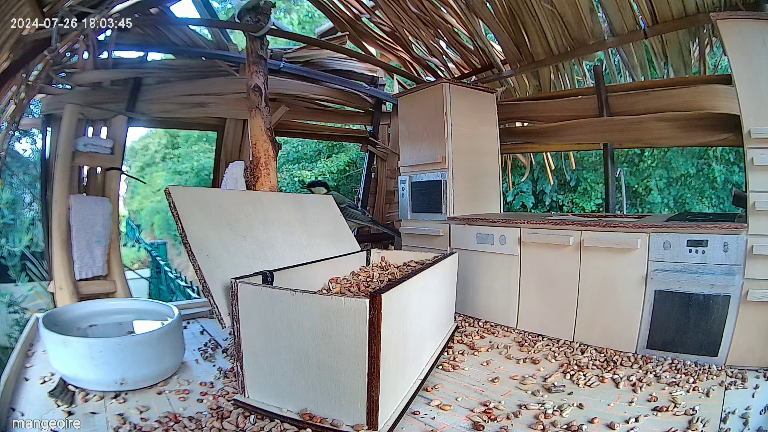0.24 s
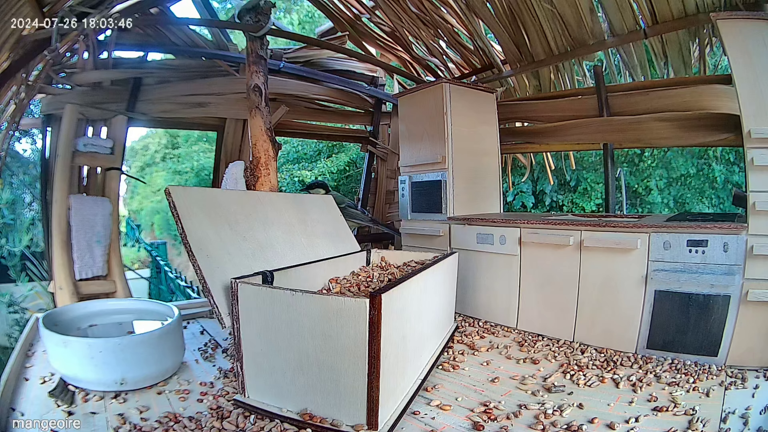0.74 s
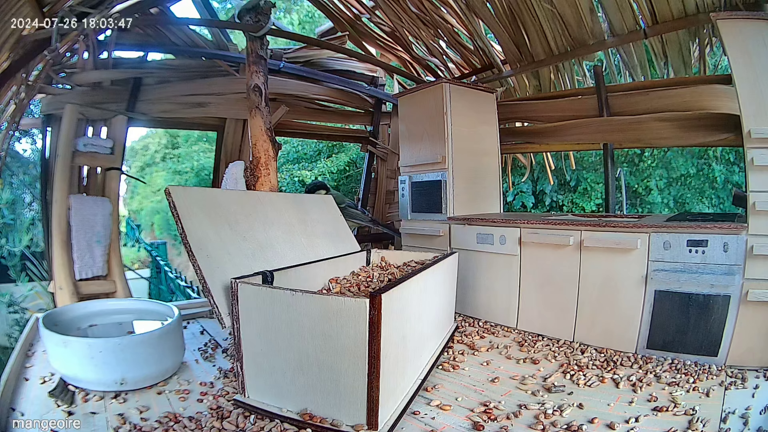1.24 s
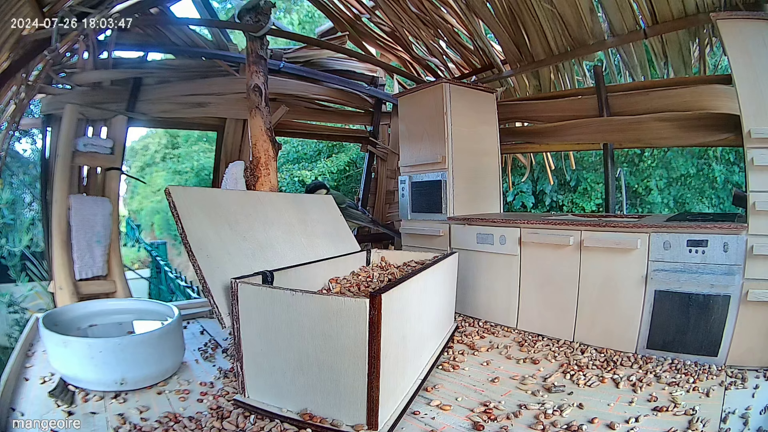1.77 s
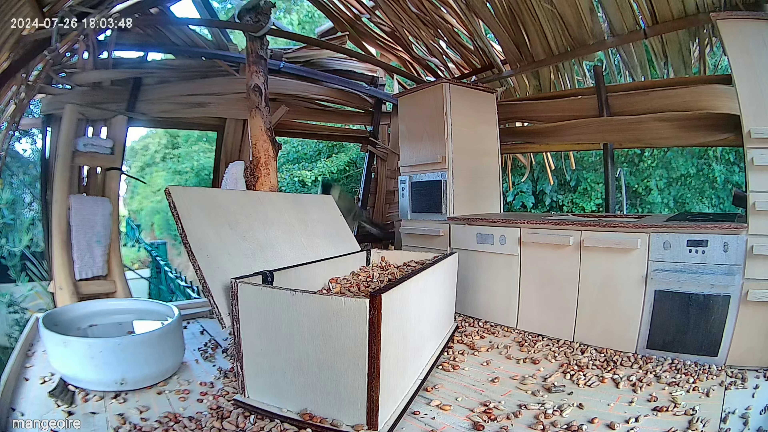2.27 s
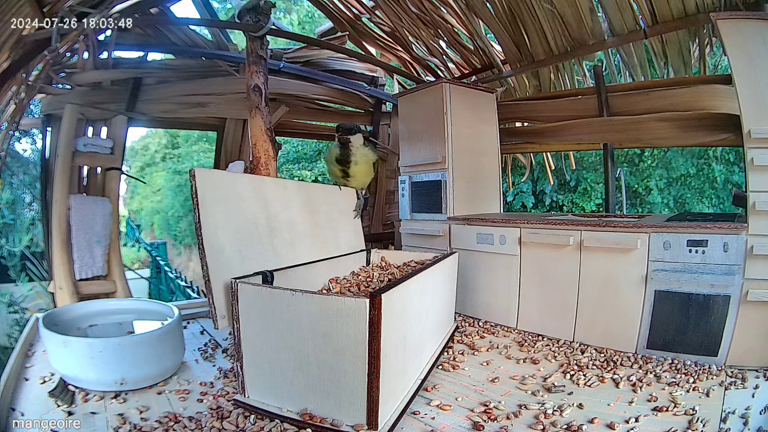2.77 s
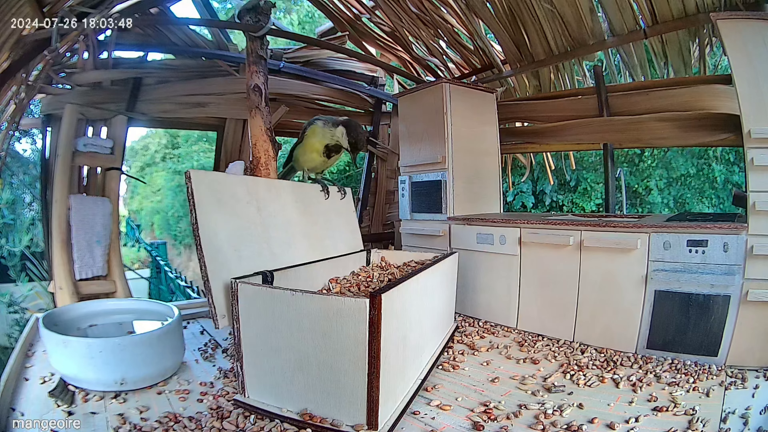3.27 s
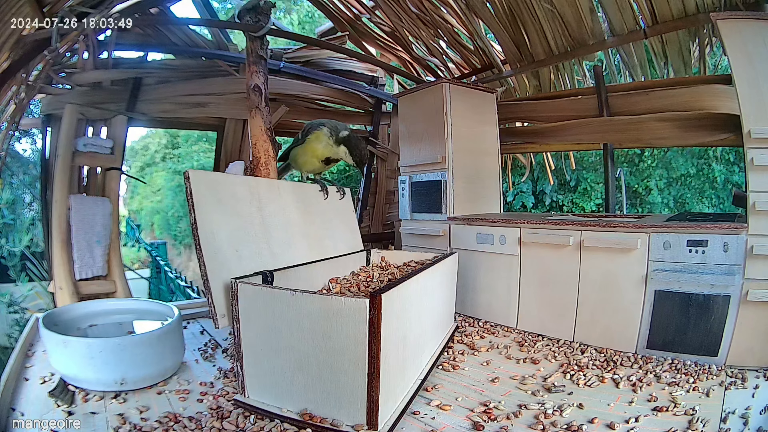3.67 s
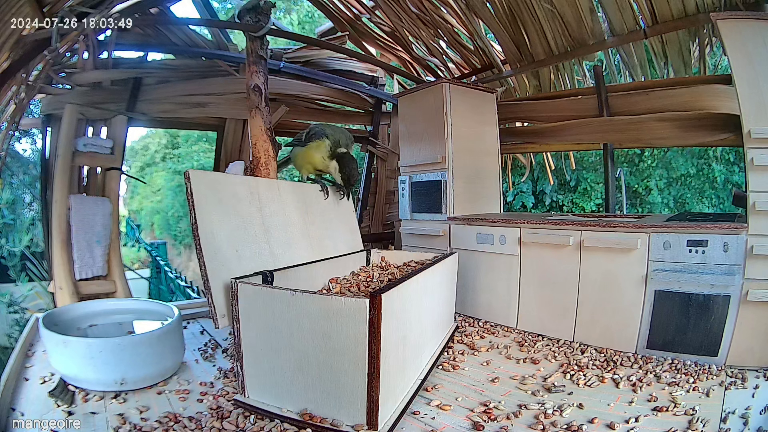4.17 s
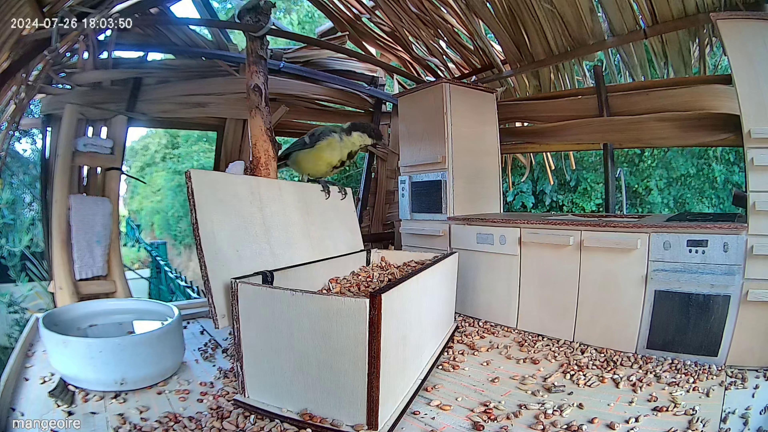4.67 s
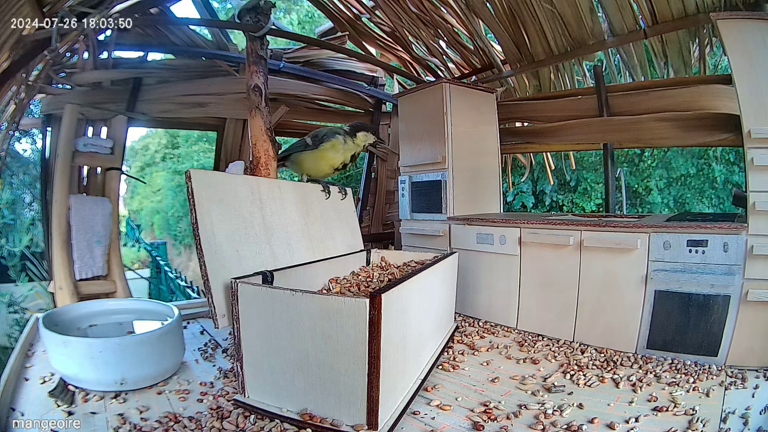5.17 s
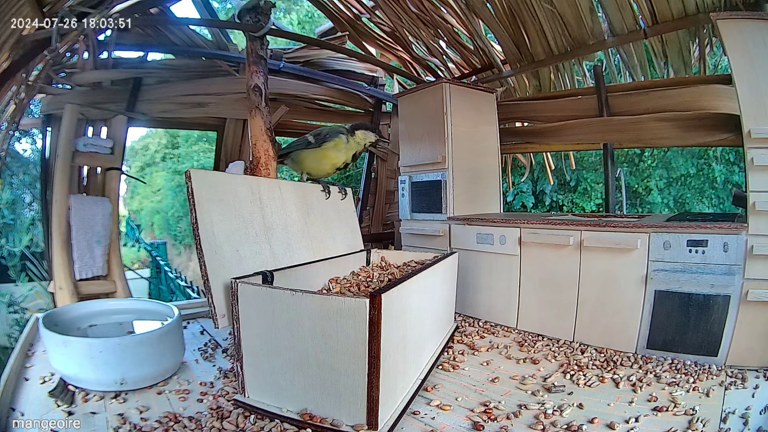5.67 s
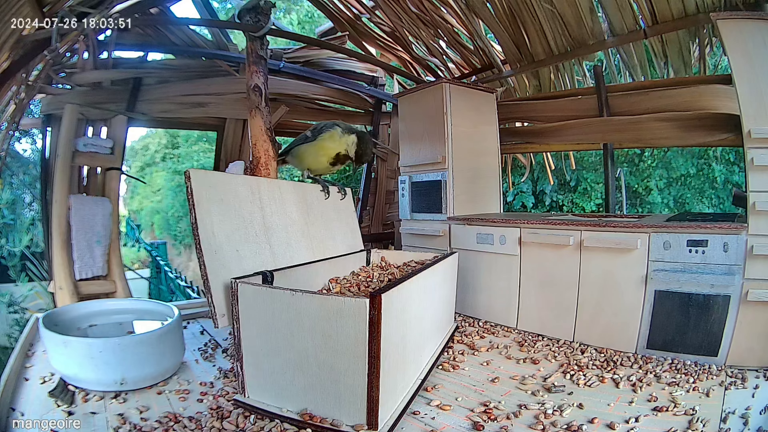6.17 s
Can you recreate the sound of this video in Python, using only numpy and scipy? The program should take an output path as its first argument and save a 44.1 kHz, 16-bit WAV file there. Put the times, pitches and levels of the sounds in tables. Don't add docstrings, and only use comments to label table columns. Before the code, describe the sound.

Sharp tit calls and trills ring among trees with faint ticks and one click, fading before a brisk alternating high-low birdsong.

```python
import sys
import numpy as np
from scipy import signal
from scipy.fft import rfft, irfft, next_fast_len
from scipy.io import wavfile
from scipy.ndimage import uniform_filter1d, map_coordinates

SR = 44100
rng = np.random.default_rng(int(sys.argv[2]) if len(sys.argv) > 2 else 0)


def put_to_file(sound):
    columns = np.atleast_2d(sound).T
    safe = np.clip(columns, -1, 1)
    whole_steps = np.round(safe * 32767)
    wavfile.write(sys.argv[1], SR, whole_steps.astype(np.int16))


def magnitude_from_level(level_db):
    exponent = np.asarray(level_db, float) / 20
    return 10 ** exponent


N = 283651
CUT_S = 4.12


def unit(x):
    return x / np.sqrt(np.mean(x ** 2) + 1e-20)


def wobble(size, rate):
    return map_coordinates(rng.standard_normal(400), [np.arange(size) * rate / SR % 390])


def filtered(x, response):
    m = next_fast_len(N + 8192)
    return irfft(rfft(x, m) * response(np.fft.rfftfreq(m, 1 / SR)), m)[..., :N]


def coloured(points):
    f, db = np.transpose(points)
    gain = lambda hz: magnitude_from_level(np.interp(np.log(hz + 1), np.log(f), db, -120, -120))
    return unit(filtered(rng.standard_normal(N), gain))


def breath_noise(size, low_hz, high_hz, order):
    b, a = signal.butter(order, [low_hz / SR * 2, high_hz / SR * 2], "band")
    return signal.lfilter(b, a, rng.standard_normal(size))


def gate(t, start, end, rise, fall):
    ramp = np.minimum((t - start) / rise, (end - t) / fall)
    return np.sin(np.pi / 2 * np.clip(ramp, 0, 1)) ** 2


def peak(hz, centre_hz, width_hz):
    return 1 / np.sqrt(1 + ((hz - centre_hz) / width_hz) ** 2)


def note(length, hz, db, glide_hz, swell_db, lead):
    t = np.arange(-lead, length + .012, 1 / SR)
    where = (t / length - .3) / 0.51
    pitch = hz + glide_hz * np.clip(where, -.5, 1.4)
    return t, pitch, magnitude_from_level(db + swell_db * np.clip(where, -.4, 1.5))


def add(out, s, hz, partials):
    phase = 2 * np.pi * np.cumsum(hz) / SR
    out[round(s * SR):][:len(hz)] += sum(
        np.sqrt(2) * g * np.sin(k * phase + k * k) * (k * hz < 15800) for k, g in partials)


def add_air(out, s, air):
    out[round(s * SR):][:len(air)] += air


# (time [s], level [dB])
WOOD_FADER = [(0, -72.5), (.32, -66.5), (2.0, -70), (3.0, -70.5), (3.35, -65.5), (3.62, -74), (3.92, -81),
              (4.2, -83), (5.1, -73.5), (6.43, -73.5)]
# (frequency [Hz], level [dB per Hz])
MURMUR_SPECTRUM = [(300, -62), (600, -32.5), (1000, -6), (1700, -2), (2200, -7), (4200, 0.5), (6000, -17.5),
                   (9000, -33)]
# (frequency [Hz], level [dB per Hz])
HISS_SPECTRUM = [(150, -23), (900, -22.5), (1750, -4), (4000, -1), (14800, -9), (16000, -11)]
# (frequency [Hz], level [dB per Hz])
HUM_SPECTRUM = [(20, -26.5), (35, -11), (54, 6), (80, -14), (120, -28.5), (150, -63.5)]


def background():
    t = np.arange(N) / SR
    hiss = coloured(HISS_SPECTRUM)
    dull = filtered(hiss, lambda hz: 1 / (1 + (hz / 8650) ** 40))
    hiss = np.where((t > 3.08) & (t < 3.85), dull, hiss)
    murmur = magnitude_from_level(8 + 0.66 * wobble(N, 11)) * (t < CUT_S) * coloured(MURMUR_SPECTRUM)
    fader = magnitude_from_level(np.interp(t, *np.transpose(WOOD_FADER)))
    return fader * (murmur + magnitude_from_level(8.5) * hiss) + magnitude_from_level(-87) * coloured(HUM_SPECTRUM)


# (time [s], peak level [dB])
TWIGS = [
    (1.0161, -39.5),
    (1.0564, -45.5),
    (1.1667, -44),
    (2.0358, -39),
    (2.4033, -41.5),
    (3.267, -24),
    (3.3231, -53),
]


def ticks():
    out, t = np.zeros(N), np.arange(400) / SR
    for s, db in TWIGS:
        out[round(s * SR):][:len(t)] += magnitude_from_level(db + 1 - 60 * t / 0.016) * rng.standard_normal(len(t))
    return filtered(out, lambda hz: (hz / 1400) ** 6 / (1 + (hz / 1400) ** 6) / (1 + (hz / 6500) ** 8))


# (frequency [Hz], level [dB], share of one-sided push [1])
GLITCH = [
    (6300, -5.5, 0.1),
    (5200, -15.5, 0.92),
]


def click():
    t = np.arange(N) / SR - 2.74638
    window = np.exp(-(t / .00014) ** 4)
    channels = []
    for hz, db, push in GLITCH:
        body = magnitude_from_level(db) * (push - np.cos(2 * np.pi * hz * t))
        edge = magnitude_from_level(-14.5) * np.cos(4 * np.pi * hz * t)
        channels.append(window * (body + edge))
    return np.array(channels)


def slurs(rows, edge, bend, rough_db, jitter, third_db):
    out = np.zeros(N)
    for s, length, first, middle, last, db in rows:
        u = np.arange(-.12, 1.12, 1 / (SR * length))
        hz = middle + np.where(u < .5, first - middle, last - middle) * np.abs(2.5 * u - 1.25) ** bend
        hz = hz * (1 + jitter * wobble(len(u), 270))
        gain = magnitude_from_level(db + rough_db * wobble(len(u), 5 / length ** 1.4)) * gate(u, -0.11, 1.12, edge, edge)
        rough = wobble(len(u), 900)
        second = magnitude_from_level(-25.5) * gain ** 2 * rough
        third = magnitude_from_level(third_db) * gain ** 3 * (1 + .5 * rough)
        add(out, s - 0.088 * length, hz, [(1, gain), (2, second), (3, third)])
    return out


# (time [s], length [s], pitch [Hz], sweep [Hz], level [dB])
FAR_BIRDS = [(0.061, 0.27, 2508, -71, -63), (0.134, 0.28, 5330, 101, -61.5),
             (0.273, .072, 3950, -2400, -73), (0.969, .039, 5300, -300, -67), (1.199, .07, 4420, -130, -70),
             (1.32, .09, 3050, -400, -70.5), (1.512, .05, 4930, -700, -69), (1.66, .05, 4500, -1400, -67),
             (2.401, 0.27, 3635, -48.5, -65.5), (3.631, .045, 4300, 2093, -65.5),
             (3.762, .073, 7390, 401.5, -61), (5.047, 0.031, 6170, -700, -65.5),
             (5.33, 0.038, 5100, -800, -63.5), (5.40, .04, 5010, -490, -70)]


def distant():
    rows = [(s, d, hz - sweep / 2, hz, hz + sweep / 2, db) for s, d, hz, sweep, db in FAR_BIRDS]
    return slurs(rows, .2, 1.05, 2.5, .025, -60)


# (time [s], length [s], pitch [Hz], glide [Hz], level [dB])
THIN_NOTES = [
    (3.0358, 0.13, 8910, -82, -24),
    (3.1684, .110, 8055, -48.5, -15),
    (3.226, .092, 8490, 119, -28),
    (3.457, 0.076, 8080, -48, -54),
]


def seets():
    out = np.zeros(N)
    for s, length, centre, glide, db in THIN_NOTES:
        loud, top = db > -20, centre > 8700
        t, hz, gain = note(length, centre, db, glide, 1 - 7 * top, .012)
        swoop = loud * -900 * np.exp(np.minimum(-t / .004, np.log(5.2)))
        drop = (not top) * -520 * np.exp(np.minimum(t - length, .006) / .004)
        hz = hz + swoop + drop + 25 * wobble(len(t), 200)
        lead = .008 * loud
        gain = gain * gate(t, -lead - .001, length + 0.012, 0.0013 + lead, 0.02)
        gain = gain * magnitude_from_level(1.0 * wobble(len(t), 99))
        half = gain * magnitude_from_level(-42.5 + 3.3 * wobble(len(t), 30)) * top
        add(out, s + t[0], hz, [(1, gain * peak(hz, centre, 700)), (.5, half)])
    return out


# (time [s], length [s], pitch [Hz], level [dB], swell [dB])
FALLING_NOTES = [
    (3.4082, 0.087, 5332, -11, -4),
    (3.701, 0.086, 5310, -18.5, 0),
]
# (time [s], length [s], pitch [Hz], level [dB], swell [dB])
BUZZ_NOTES = [
    (3.5624, 0.078, 7604, -33, 3),
]


def chews():
    out = np.zeros(N)
    for s, length, centre, db, swell in FALLING_NOTES:
        t, hz, gain = note(length, centre, db, 30, swell, 0.022)
        hz = hz + 560 * np.exp(-t / 0.00804) + 340 * np.maximum(t / length, 0) ** 2.9
        hz = hz + 30 * wobble(len(t), 303) + 40 * wobble(len(t), 52)
        broken = np.abs(1 - 0.12 * wobble(len(t), 300) ** 2 - .17 * wobble(len(t), 110) ** 2)
        gain = gain * gate(t, -0.0094, length + 0.009, 0.018, 0.05) * broken
        add(out, s + t[0], hz, [(1, gain), (2, gain * magnitude_from_level(-33.0) * wobble(len(t), 500))])
    for s, length, centre, db, swell in BUZZ_NOTES:
        t, hz, gain = note(length, centre, db, 0, swell, 0.0015)
        vibrato = 330 * np.sin(2 * np.pi * 235 * t + 1.3 * wobble(len(t), 150))
        hz = hz + vibrato + 90 * wobble(len(t), 500)
        uneven = np.abs(1 + .5 * wobble(len(t), 500))
        gain = gain * gate(t, -0.00066, length + 0.0047, 0.0072, 0.028) * uneven
        add(out, s + t[0], hz, [(0.98, gain)])
    return out


# (time [s], length [s], pitch [Hz], level [dB], vibrato depth [Hz])
HIGH_NOTES = [
    (4.3911, 0.069, 5502, -14, 225),
    (4.7296, 0.0826, 5412, -10.5, 190),
    (5.097, 0.069, 5600, -9.5, 161.6),
    (5.433, 0.0908, 5332, -10, 214.6),
]
# (time [s], length [s], level [dB], wobble depth [Hz], lead-in [s])
LOW_NOTES = [
    (4.172, .082, -19.5, 151, 0.01),
    (4.5233, .0832, -13.5, 130, .011),
    (4.8735, 0.078, -10, 200, .013),
    (5.2211, .0835, -7.5, 322.7, .011),
    (5.58, 0.079, -8.5, 112, 0.015),
]


def song_high(out):
    for s, length, centre, db, depth in HIGH_NOTES:
        t, hz, gain = note(length, centre, db, 30, -1.5, 0.012)
        size = len(t)
        beat = 2 * np.pi * 188 * t + 0.62 * wobble(size, 60)
        quaver = depth * np.sin(beat - 2) * gate(t, -0.035, length + .01, 0.023, 0.082)
        drop = 300 * np.exp(np.minimum(t - length, 0) / 0.0032)
        hz = hz - quaver - drop + 40 * wobble(size, 600) + 35 * wobble(size, 29.79)
        gain = gain * gate(t, -.002, length + .005, .003, .022) * (1 - .55 * np.exp(-np.maximum(t, 0) / .011))
        gain = gain * magnitude_from_level(.6 * np.sin(2 * beat) + .5 * wobble(size, 400) + .7 * wobble(size, 40))
        second = gain * magnitude_from_level(-47) * (0.78 + wobble(size, 900))
        between = gain * magnitude_from_level(-55.5) * wobble(size, 1800)
        half = gain * magnitude_from_level(-44) * wobble(size, 740) * wobble(size, 50)
        add(out, s + t[0], hz, [(1, gain), (2, second), (2.5, between), (.5, half)])


def song_low(out):
    for s, length, db, depth, lead in LOW_NOTES:
        flat_hz = .33 * (depth - 105)
        swell_db = -4 * (s - 4.58)
        t, hz, gain = note(length, 4002 - flat_hz, db, .6 * flat_hz, swell_db, .022)
        size = len(t)
        below = 1 / (1 + np.exp(t / .0008))
        scoop = 660 * below + 800 * np.exp(-np.maximum(t + lead, 0) / 0.0017)
        period_s = np.where(t < .002, .0092, .0072)
        cycle = 1 - np.cos(2 * np.pi * (t - .002) / period_s)
        fading = np.exp(-np.abs(t - .005) / np.where(t < .005, .02, .007))
        pitch = hz - scoop - 200 * cycle * below - (cycle - .35) * depth * fading * (1 - below)
        gain = gain * gate(t, -lead, length + .004, 0.0033, .02) * magnitude_from_level(0.33 * wobble(size, 110))
        gain = gain * (1 - 0.069 * np.exp(-np.maximum(t, 0) / 0.0071))
        tone = gain * peak(pitch, hz, 260) ** 1.9
        split = tone * gate(t, length - .016, 1, .01, 1) * magnitude_from_level(-38)
        add_air(out, s + t[0], magnitude_from_level(-37) * gain * below * breath_noise(size, 3000, 9500, 2))
        caught = below * peak(2 * pitch, 5300, 430) * magnitude_from_level(-22.5 + 2.62 * wobble(size, 420))
        second = gain * (magnitude_from_level(-40.5) + caught)
        third = tone * magnitude_from_level(-46.5 + 2.5 * wobble(size, 50))
        add(out, s + t[0], pitch, [(1, tone), (2, second), (3, third), (.5, split), (1.5, split)])


def song():
    out = np.zeros(N)
    song_high(out)
    song_low(out)
    return out


# (time [s], length [s], pitch [Hz], level [dB])
DOWN_STEPS = [(1.775, .012, 7770, -34), (1.7918, .011, 7080, -18), (1.8092, .015, 6060, -11.5),
              (1.8317, .015, 5580, -9.5), (1.8522, .014, 5100, -10.5), (1.875, .008, 4840, -19.5),
              (1.972, .011, 5200, -18), (2.051, .0105, 7800, -33.5), (2.0678, .011, 6920, -19),
              (2.086, .012, 6150, -13.5), (2.109, .012, 5720, -11), (2.131, 0.01, 5400, -18),
              (2.226, .0077, 5040, -18)]
# (time [s], length [s], pitch [Hz], level [dB])
UP_STEPS = [(1.8554, 0.013, 3416, -20), (1.8722, .016, 3630, -12), (1.8911, .016, 4060, -8.5),
            (1.9117, .0165, 4450, -8), (1.9302, .017, 4790, -9.5), (1.952, .0205, 4970, -8.5),
            (2.107, .017, 3364, -34.5), (2.1294, .014, 3430, -20.5), (2.148, .014, 3695, -14),
            (2.167, .016, 4160, -7.5), (2.186, 0.017, 4630, -10), (2.205, .021, 5005, -10.5)]


def trills():
    rows = []
    for s, d, hz, db in DOWN_STEPS:
        hook = 210 * np.tanh((hz - 6040) / 150)
        rows.append((s, d, hz * 1.11, hz, hz - 110 + hook, db))
    for s, d, hz, db in UP_STEPS:
        lean = 0.22 * max(hz - 4000, 0)
        first = hz + 5.2 + lean + 80 * rng.standard_normal()
        rows.append((s, d, first, hz, hz - 70, db))
    return slurs(rows, 0.45, 1.3, .6, 0, -11)


# (time [s], length [s], pitch [Hz], level [dB])
WHISTLES = [
    (0.455, 0.046, 4266, -9),
    (0.6906, 0.049, 4254, -8.5),
]
# (time from the whistle [s], share of its pitch [1])
PITCH_CLIMB = [(-.045, .41), (-.032, .55), (-.013, .69), (-.003, .765), (.002, .92), (.010, .99),
               (.016, 1.001)]


def rising():
    out = np.zeros(N)
    for s, length, centre, db in WHISTLES:
        t, hz, gain = note(length, centre, db, -28.5, -0.45, 0.052)
        size = len(t)
        hz = hz * np.interp(t, *np.transpose(PITCH_CLIMB)) * (1 + 0.0067 * wobble(size, 400) * (t < 0))
        stack = gain * gate(t, -0.049, 0.015, 0.015, 0.042) * magnitude_from_level(0.81 * wobble(size, 400))
        odd = gate(t, -.046, -0.012, .006, 0.0087)
        lines = []
        for k in range(3, 10):
            line_hz = k / 2 * hz
            throat = peak(line_hz, 5960, 410) ** 1.2 / (1 + (line_hz / 7300) ** 12)
            lines.append((k / 2, stack * magnitude_from_level(-5.0) * throat * (odd if k % 2 else 1)))
        whistle = gain * gate(t, -0.042, length + .006, 0.0022, 0.013) * peak(hz, centre, 500) ** 2.2
        held = whistle * gate(t, 0, 0.89, .012, 0.87)
        add(out, s + t[0], hz, lines + [(1, whistle), (2, held * magnitude_from_level(-43.5)), (3, held * magnitude_from_level(-34.5))])
        top = breath_noise(size, 9500, 13000, 4)
        breath = breath_noise(size, 3500, 8300, 3)
        add_air(out, s + t[0], magnitude_from_level(-14.0) * stack * (breath + magnitude_from_level(-23.5) * top))
    return out


def trees(x, near_db, far_db, near_s, far_s):
    t = np.arange(2 * SR) / SR
    near, far = (rng.standard_normal(len(t)) * magnitude_from_level(-60 * t / t60) * (t > .006) for t60 in (near_s, far_s))
    tail = magnitude_from_level(near_db) * near / np.linalg.norm(near) + magnitude_from_level(far_db) * far / np.linalg.norm(far)
    return x + signal.fftconvolve(x, tail)[:N]


def echo(x, delay_s, db):
    return magnitude_from_level(db) * np.roll(x, round(delay_s * SR))


# (frequency [Hz], level [dB per Hz])
HAZE_SPECTRUM = [(20, -42.5), (700, -35), (1500, -9.5), (3000, -4), (6000, -0.5), (9000, -10.5),
                 (15500, -10)]


def hazy(x, skirt_db, wide_db, thump_db):
    level = np.sqrt(np.abs(uniform_filter1d(x ** 2, size=60)))
    jump = level - uniform_filter1d(level, size=500)
    change = np.sqrt(np.abs(uniform_filter1d(jump ** 2, size=700)))
    flutter = coloured([(5, 1), (500, 2), (2000, -18.5), (3200, -46)])
    thump = filtered(x ** 2, lambda hz: hz / (hz + 60) / (1 + (hz / 130) ** 4))
    return x + magnitude_from_level(skirt_db) * x * flutter + magnitude_from_level(wide_db) * change * coloured(HAZE_SPECTRUM) + magnitude_from_level(thump_db) * thump


def masked(x, depth_db, spread_db):
    z = signal.stft(x, nperseg=1024)[2]
    power = np.mean(np.abs(z[:512].reshape(32, 16, -1)) ** 2, axis=1)
    level = 10 * np.log10(power + 1e-30) + spread_db * np.arange(32)[:, None]
    under = np.repeat(np.maximum.accumulate(level, axis=0) - level, 16, axis=0)
    z[:512] *= np.clip((depth_db - under) / 3, .03, 1)
    return signal.istft(z, nperseg=1024)[1][:N]


def scene():
    t = np.arange(N) / SR
    rolls = hazy(trills(), -30.5, -19.5, -47)
    calls = hazy(rising(), -36.5, -26, -53) + rolls
    first = trees(calls, -21, -35.5, 0.27, 1.3)
    first = first + echo(calls, 0.095, -41.5) + echo(rolls, 0.013, -18.5)
    thin = trees(seets(), -21, -35, .25, .8)
    middle = hazy(thin + trees(chews(), -14, -34, 0.36, 0.9), -33.0, -53.5, -40)
    fade = magnitude_from_level(-95 * np.maximum(t - 3.8, 0)) * (t < CUT_S)
    early = (first + middle + ticks()) * fade
    far = trees(distant(), 0, -6, .15, .6)
    late = trees(hazy(song(), -36, -28.5, -53.0), -26.5, -30.5, 0.22, 0.76)
    mono = masked(early + far + late + background(), depth_db=47.5, spread_db=1.5)
    lag = lambda hz: np.exp(-1j * np.pi * hz / SR * 0.99 * np.array([[1], [-1]]))
    return filtered(np.array([mono, mono]), lag) + click()


def band_limit(x):
    return signal.sosfilt(signal.butter(12, 16660, fs=SR, output="sos"), x)


def record(dry):
    return band_limit(dry)


dry = scene()
out = record(dry)
put_to_file(out)
```